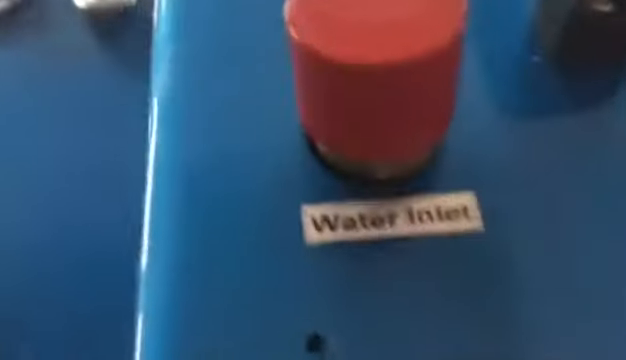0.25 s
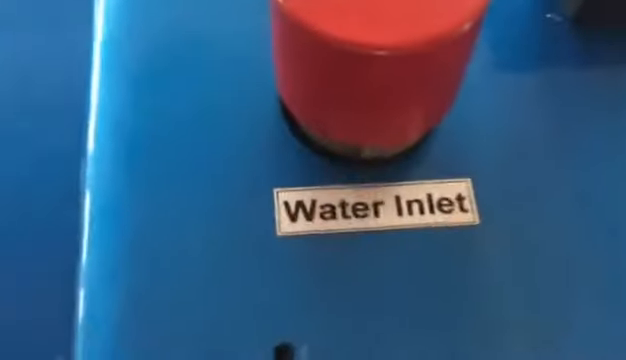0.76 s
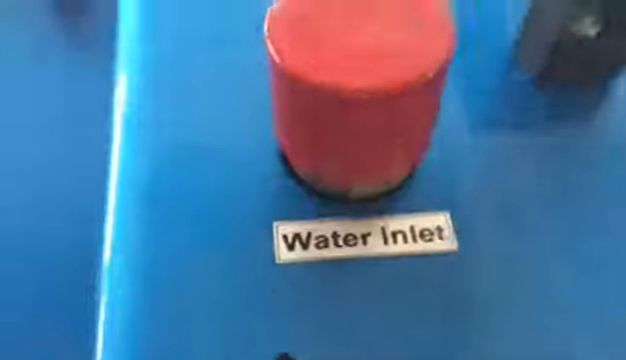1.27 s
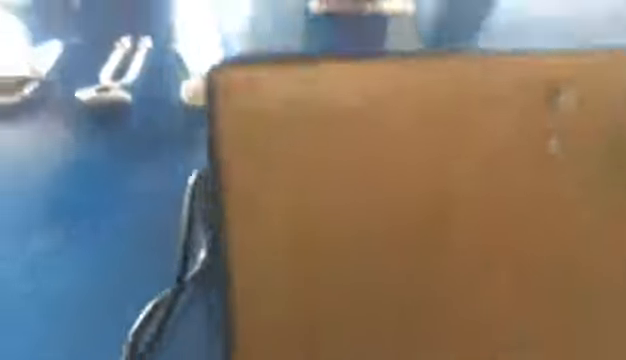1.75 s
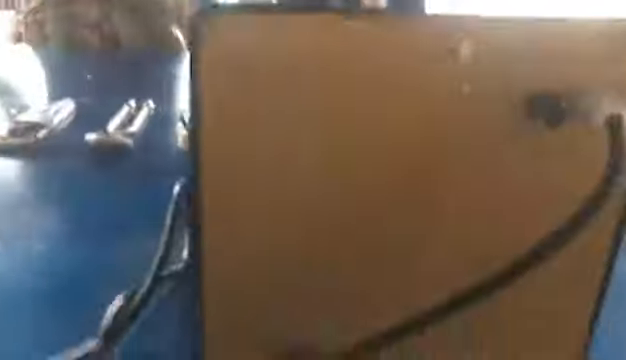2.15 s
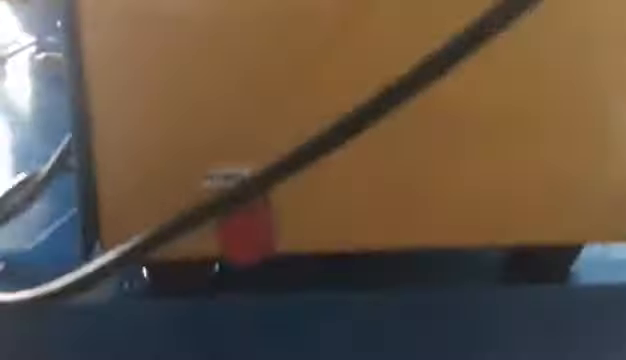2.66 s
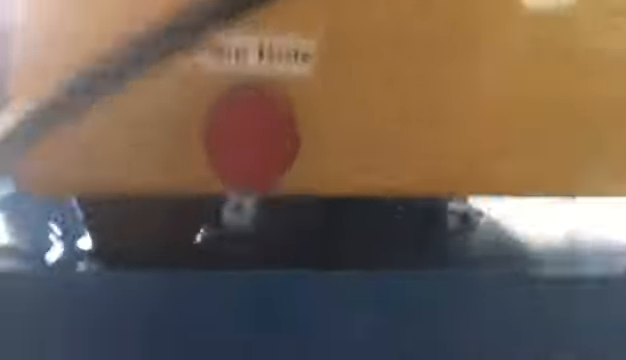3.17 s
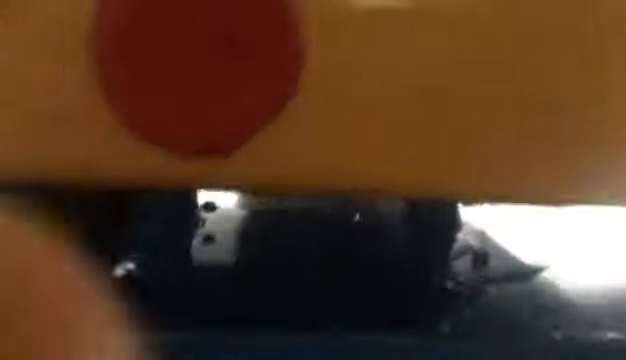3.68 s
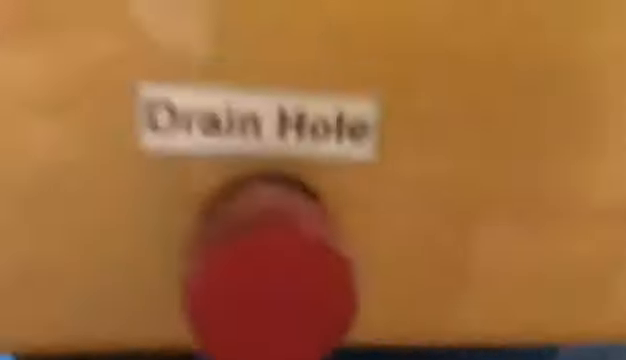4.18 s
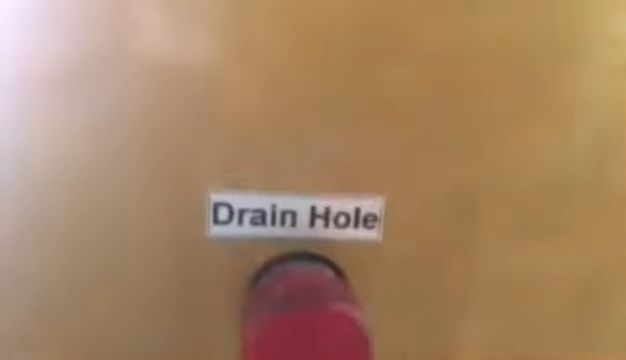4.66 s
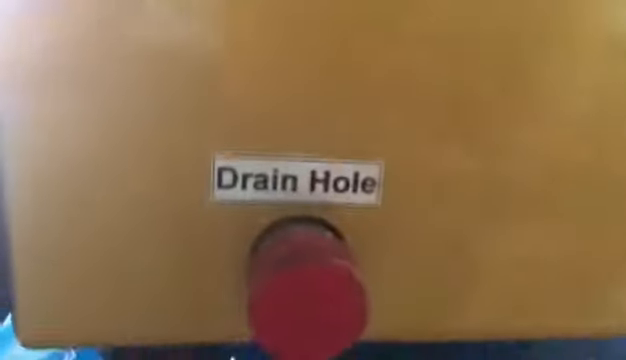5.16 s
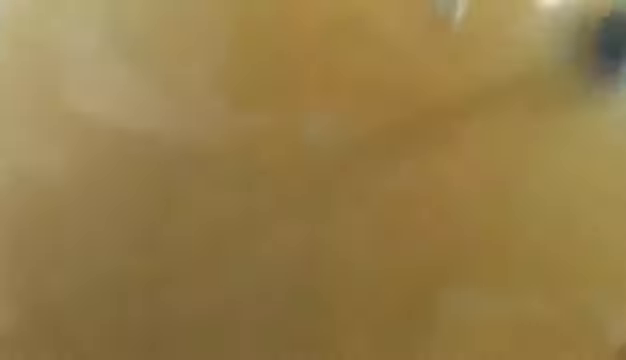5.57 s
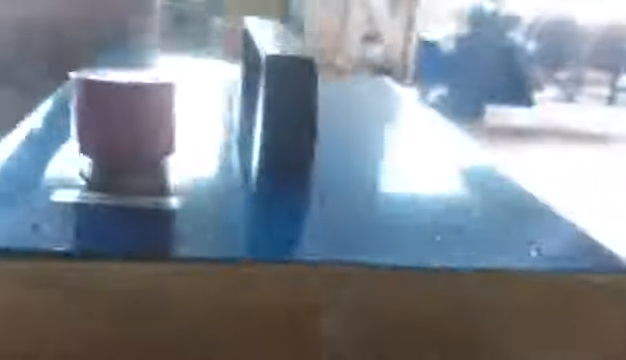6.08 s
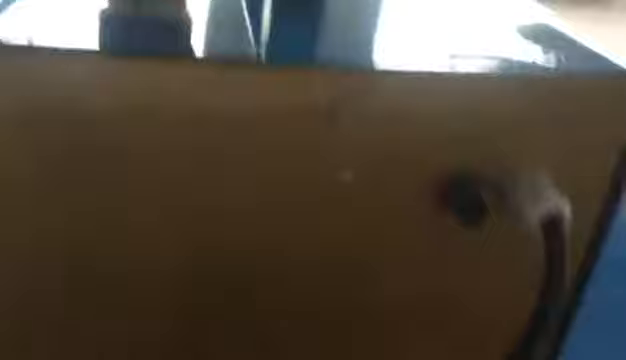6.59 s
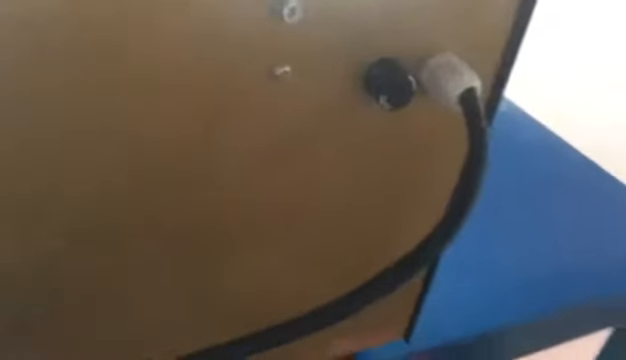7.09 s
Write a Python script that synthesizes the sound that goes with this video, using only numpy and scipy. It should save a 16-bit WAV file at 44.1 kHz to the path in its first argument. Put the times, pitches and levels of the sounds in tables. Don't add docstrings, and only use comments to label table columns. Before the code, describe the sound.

A bench cooling unit drones and whirs continuously, its tone shifting as the microphone moves, with brief rattling clinks, dry scuffs and one thump.

```python
import sys
import numpy as np
from scipy import signal
from scipy.fft import rfft, irfft, next_fast_len
from scipy.io import wavfile
from scipy.ndimage import uniform_filter1d, map_coordinates

SR = 44100
rng = np.random.default_rng(int(sys.argv[2]) if len(sys.argv) > 2 else 0)


def volts(x):
    e = np.asarray(x, float) / 20
    return 10 ** e


def digitize_waveform(pressure):
    field = np.atleast_2d(pressure).T
    bounded = np.clip(field, -1, 1)
    quanta = np.round(bounded * 32767).astype(np.int16)
    wavfile.write(sys.argv[1], SR, quanta)


N = 323253
TICKS = np.arange(0, N + 32, 32)
KNOCK_HZ, SHAFT_HZ, MAINS_HZ = 213.1, 43.3, 99.9

# from_s, to_s
PLACES = [(0, 1.48), (1.78, 2.2), (2.66, 2.9), (3.55, 4.05), (4.4, 5.4), (5.7, 7.33)]
# time_s, hum_db, rush_db
WANDER = [(0, -28, -41.5), (.35, -25.5, -40), (1.24, -26, -40.5), (1.67, -27, -41.5), (2.18, -29, -42.5),
          (2.7, -28.5, -44.5), (3.0, -28, -42.5), (3.37, -28, -40), (3.75, -27.5, -39), (4.3, -26.5, -38.5),
          (4.82, -26.7, -40), (5.35, -27.2, -40), (5.65, -26.8, -41.5), (6.15, -28.5, -43),
          (6.45, -28, -41), (6.8, -26.5, -42.5), (7.25, -27.5, -41.5), (7.33, -30, -40)]
# overtone2_db, overtone3_db, overtone4_db, overtone5_db, overtone6_db
OVERTONES = [(-57.5, -48.5, -43, -40.5, -46), (-55.5, -49, -48, -54, -43), (-52, -46.5, -43, -37, -45.5),
             (-50.5, -43.5, -37.5, -37.5, -40), (-52.5, -45, -43.5, -37.5, -46),
             (-54.5, -53, -54, -49.5, -45.5)]
# time_s, overtone_number, half_length_s, level_db
NODES = [(0, 3, .2, -23), (1.61, 3, 0.15, -17), (2.44, 5, 0.18, -15), (2.722, 4, 0.46, -8),
         (2.95, 6, 0.15, -36), (5.518, 6, .08, -9), (5.653, 4, 0.16, -8), (6.85, 4, .2, -8),
         (7.2, 5, 0.25, -17)]
# knock_multiple, mains_multiple, shaft_multiple, level_db
SIDE_LINES = [(1, 0, -1, -56), (1, 0, 1, -51), (3, 0, 1, -54), (3, 1, 0, -58), (4, 0, -1, -56),
              (4, 0, 1, -55), (5, -1, -1, -58), (4, 1, 0, -54), (5, -1, 0, -53), (5, 0, -1, -55),
              (5, 0, 1, -54), (6, -1, -1, -57), (5, 1, 0, -60), (6, -1, 0, -62), (6, 0, 1, -62),
              (6, 1, 0, -59), (7, -1, 1, -60), (7, 0, -1, -55), (7, 0, 0, -54), (7, 0, 1, -57),
              (8, -1, -1, -57), (7, 1, 0, -59), (8, 0, -1, -61), (8, 0, 0, -55), (8, 0, 1, -63),
              (8, 1, 0, -61), (9, 1, 0, -65), (10, 1, 0, -60), (11, 1, 0, -63), (12, 0, 0, -58)]
BEATS = [(0, 0, .6), (1, 0, 1.6), (0, 1, 1.1), (1, -1, 1.2), (1, 1, .9)]
# pitch_hz, depth_db
RIDGES = [(1200, 1.2), (2200, 2.6), (6000, 3)]
# pitch_hz, level_db (per Hz)
CABINET = [(190, 0.5), (240, 0.5), (380, -8), (1000, -6), (3000, -14.5), (4500, -21), (7000, -25.5),
           (14200, -40)]
# pitch_hz, width_hz, level_db
GRILLE = [(2900, 120, -5.5), (4994, 270, -4.5), (6420, 300, 4), (9360, 240, 4.5), (10330, 250, -8),
          (11970, 310, 7.5)]
# pitch_hz, width_octaves
PANELS = [(800, 0.45), (1600, .3), (3100, 0.37), (6500, 0.63), (14000, 0.74)]
# panel1_db, panel2_db, panel3_db, panel4_db, panel5_db
FACING = [(3, 1.5, 0.5, -.5, -3.5), (-3, -2, -0.5, 0, -1), (-1, -5.5, -1.5, 1, 1), (-1.5, 2, 4, 1.5, 2),
          (2, 4.5, -2.5, 1.5, 3.5), (-2.5, -4.5, 0, -1.5, 2)]
# pitch_hz, width_hz, level_db
STANDING = [
    [(730, 69, -8.5), (2030, 200, -5), (2283, 160, 5.5)],
    [(1074, 150, 6.5), (1200, 170, -7.5), (1530, 78, 6), (1840, 230, -2.5), (2220, 73, 4)],
    [(1980, 77, -3), (2210, 250, 3.5), (2860, 100, 2)],
    [(610, 130, 5), (1030, 200, 5.5), (1850, 49, 6), (2630, 58, 4)],
    [(1900, 220, -5.5), (2290, 120, 7), (2900, 85, 4.5), (3680, 560, 3)],
    [(1095, 360, 2), (1230, 87, -5.5), (1540, 75, 8.5), (2165, 52, 3.5), (2720, 31, 2)],
]
# pitch_hz, width_hz, level_db
GLANCING = [
    [(7400, 150, -9), (8330, 270, -1.5), (11850, 180, -3)],
    [(5000, 180, 1), (7500, 170, -7), (11300, 500, 3), (14100, 160, 6)],
    [(5130, 150, -2), (7340, 350, -3), (10910, 270, 5.5), (13800, 350, -4)],
    [(4300, 350, -2), (5070, 220, 3), (7300, 610, -3), (7700, 130, 4), (13000, 180, 4), (13700, 230, -10)],
    [(4430, 250, -4.5), (5230, 170, -5.5), (7130, 220, -4), (7980, 170, 3.5), (9000, 120, -2),
     (10340, 130, 10.5), (10500, 130, -5), (12200, 200, -6), (13800, 350, -7)],
    [(5040, 180, 4.5), (11900, 250, -3.5)],
]
# pitch_hz, level_db (per Hz)
RUMBLE = [(22, -36), (31, -21.5), (45, -5), (60, 1), (90, -2), (140, -5), (190, -7), (215, -66.5)]
RUMBLE_DB = [-42.5, -44, -42.5, -42.5, -42.5, -41]
# start_s, peak_db, best_rung_hz, spread_octaves
CLINKS = [(2.042, -38, 4000, 1.2), (2.0485, -24.5, 3800, 1.2), (2.053, -30, 8000, 1.5),
          (2.057, -26, 4200, 0.87), (2.065, -30, 3700, 1), (2.077, -30, 3900, 1.1),
          (2.081, -34, 6500, 0.66), (2.088, -36, 4000, 0.84), (2.099, -34.5, 6000, 1.1),
          (2.36, -38, 12500, 0.41), (2.598, -20.5, 3550, 0.092), (2.602, -35, 7000, 0.64),
          (5.799, -42, 3250, .15)]
# pitch_hz, level_db, fade_60db_s
METAL = [(3250, -2.5, 0.048), (3550, -8, 0.047), (4030, 1.5, 0.031), (4620, -5, 0.035), (6000, -9, 0.033),
         (6850, -2.5, 0.039), (10700, -12, 0.028), (12500, -8, 0.017)]
# start_s, level_db, rise_s, fade_60db_s
SCUFFS = [
    (0.514, -48.5, .01, .28),
    (1.86, -56, .15, .35),
    (2.049, -53, .003, .3),
    (2.345, -53.5, .008, .12),
    (2.597, -56, .002, .08),
    (7.2, -56, .08, .3),
]
# pitch_hz, level_db (per Hz)
SCUFF_COLOUR = [(2000, -30), (4000, -8), (8000, -5), (10500, 1), (12000, 6), (14000, 3)]
# start_s, peak_db, swing_pitch_hz
BUMPS = [
    (3.612, -26, 150),
    (3.8302, -13.5, 95),
]
# time_s, pitch_hz, level_db
FAR_MOAN = [(6.1, 430, -75), (6.16, 470, -48), (6.33, 515, -46), (6.47, 445, -47), (6.55, 410, -75)]
# pitch_hz, step_db
COARSE = [(1500, -30), (2600, -3), (4000, 2), (6000, 4), (9000, 6), (12000, 7), (14000, 10)]


def motor():
    t = np.arange(N) / SR
    turn = 2 * np.pi * np.cumsum(smooth(KNOCK_HZ + 0.15 * wobble(4))) / SR
    shaft = turn * SHAFT_HZ / KNOCK_HZ
    mains = 2 * np.pi * MAINS_HZ * t
    hum = swell(curves(WANDER)[0] + 0.48 * wobble(14)) * np.cos(turn)
    smear = 0.63
    whine = 0
    for k, levels in enumerate(np.transpose(OVERTONES), start=2):
        silent_db = 0
        for s, order, half_s, db in NODES:
            if round(order) == k:
                silent_db = silent_db + db * np.exp(-((TICKS / SR - s) / half_s) ** 2)
        level = swell(by_place(levels) + silent_db + 0.9 * wobble(5))
        whine = whine + level * np.cos(k * turn + smear * k * k)
    side = 0
    for knock, main, rev, db in np.round(SIDE_LINES):
        hz = knock * KNOCK_HZ + main * MAINS_HZ + rev * SHAFT_HZ
        colour = np.array([place_db(k, hz) for k in range(len(PLACES))])
        level = swell(db - 1 + by_place(colour - colour.mean()) + 2.5 * wobble(4))
        side = side + level * np.cos(knock * turn + main * mains + rev * shaft + 7 * rng.random())
    return np.sqrt(2) * (hum + whine + side), turn, shaft


def rush(turn, shaft):
    knocks = np.cos(turn) + 0.29 * np.cos(2 * turn) + 0.21 * np.cos(3 * turn)
    pulse = knocks + 0.55 * np.cos(shaft) * (1 + 0.92 * np.cos(turn))
    rattle = coloured((1 + 0.4 * pulse) * rng.standard_normal(N), lambda f: -40 * (f < 4800))
    air = coloured((1 + 0.055 * pulse) * rng.standard_normal(N), lambda f: -40 * (f >= 4800))
    buzz_db = -30.5
    source = ridged(air + rattle) + volts(buzz_db) * buzz(turn, shaft)
    band_hz = np.arange(1400, 5000, 10)
    out = np.zeros(N)
    for k in range(len(PLACES)):
        band = np.sqrt(np.sum(volts(place_db(k, band_hz)) ** 2) * 20 / SR)
        nearness = smooth(by_place(np.arange(len(PLACES)) == k))
        out += nearness * coloured(source, lambda f: place_db(k, f)) / band
    return swell(curves(WANDER)[1] - 1.28 + 0.26 * wobble(9)) * out


def buzz(turn, shaft):
    scatter = 0.5
    mains = 2 * np.pi * MAINS_HZ * np.arange(N) / SR
    main, rev, depth = np.transpose(BEATS)
    angle = np.outer(main, mains) + np.outer(rev, shaft)
    swings = np.r_[np.cos(angle), np.sin(angle)]
    out = 0
    for k in range(8, 19):
        lag = 2 * np.pi * scatter * rng.random(len(BEATS)) * (main + rev ** 2 > 0)
        beating = np.r_[depth * np.cos(lag), depth * np.sin(lag)] @ swings
        out = out + swell(3 * wobble(3)) * np.cos(k * turn + 7 * rng.random()) * beating
    return out


def ridged(x):
    hz, _, z = signal.stft(x, SR, nperseg=2048)
    field = uniform_filter1d(rng.standard_normal(z.shape), size=4, axis=0)
    field = uniform_filter1d(field, size=24, axis=1)
    gain = volts(along(RIDGES, hz)[:, None] * unit(field))
    return unit(signal.istft(z * gain, nperseg=2048)[1][:N])


def place_db(k, f):
    level = along(CABINET, f) - 25 * (f < 190)
    for (hz, octaves), db in zip(PANELS, FACING[k]):
        level = level + db * np.exp(-(np.log2((f + 1) / hz) / octaves) ** 2)
    for hz, width, db in GRILLE + STANDING[k] + GLANCING[k]:
        level = level + db * np.exp(-((f - hz) / width) ** 2)
    return level


def rumble():
    def colour(f):
        low_drone = 1.7 * np.exp(-((f - 64) / 5) ** 2)
        high_drone = 6.3 * np.exp(-((f - 118) / 5) ** 2)
        return along(RUMBLE, f) + low_drone + high_drone

    duck_s, duck_length_s, duck_db = 3.99, 0.065, -9
    duck = duck_db * np.exp(-((TICKS / SR - duck_s) / duck_length_s) ** 2)
    return swell(by_place(RUMBLE_DB) + 0.9 * wobble(3.1) + duck) * noise(colour)


def clinks():
    out, t = np.zeros(N + SR), np.arange(SR // 5) / SR
    attack = 1 - np.exp(-t / 0.00054)
    for s, db, centre_hz, octaves in CLINKS:
        for hz, level, t60 in METAL:
            blur = 7 * rng.random() + np.cumsum(rng.standard_normal(len(t))) * 0.15 * hz / 4000
            off_pitch_db = -6 * (np.log2(hz / centre_hz) / octaves) ** 2
            strength = db - 4.5 + level + off_pitch_db + rng.normal(0, 1.4)
            ring = volts(strength - 60 * t / t60) * attack * np.sin(2 * np.pi * hz * t + blur)
            out[round(s * SR):][:len(t)] += ring
    return out[:N]


def scuffs():
    t = np.arange(N) / SR
    stroke = 0
    for s, db, rise, t60 in SCUFFS:
        fade = volts(db - 60 * np.clip(t - s - rise, 0, None) / t60)
        stroke = stroke + fade * np.clip((t - s) / rise, 0, 1)
    return stroke * swell(5.2 * wobble(190)) * noise(lambda f: along(SCUFF_COLOUR, f))


def bumps():
    out, t = np.zeros(N + SR), np.arange(SR // 10) / SR
    knock = np.exp(-((t - 0.0015) / 0.0005) ** 2) - 0.5 * np.exp(-((t - 0.0004) / 0.0004) ** 2)
    for s, db, hz in BUMPS:
        swing = 0.4 * volts(-60 * t / 0.08) * np.sin(2 * np.pi * hz * t)
        out[round(s * SR):][:len(t)] += volts(db) * (0.75 * knock + swing)
    return coloured(out[:N], lambda f: along([(15, -30), (50, 0)], f))


def far_moan():
    hz, db = curves(FAR_MOAN)
    turn = 2 * np.pi * np.cumsum(smooth(hz + 8 * wobble(40))) / SR
    return swell(db + 3.3 * wobble(30)) * np.sin(turn)


def camera_rounding(x, size=1024):
    first = 283
    n, k = np.arange(2 * size), np.arange(size)
    window = np.sin(np.pi * (n + 0.5) / (2 * size))
    waves = np.cos(np.pi / size * np.outer(k + 0.5, n + (size + 1) / 2))
    basis = window * waves * np.sqrt(2 / size)
    halves = np.pad(x, (size - first, 2 * size - (N - first) % size)).reshape(-1, size)
    c = np.hstack([halves[:-1], halves[1:]]) @ basis.T
    frame = np.abs(uniform_filter1d(c ** 2, size=70, axis=1))
    local = np.sqrt(np.minimum(1.1 * frame, np.abs(uniform_filter1d(frame, size=9, axis=0))))
    spare_db = -9 * (rng.random((len(c), 1)) < 0.12)
    choice = uniform_filter1d(rng.standard_normal((len(c), size // 16)), size=4, axis=0)
    choice_db = 2.5 * np.repeat(unit(choice), size // 64, axis=1)
    step = local * volts(along(COARSE, k * SR / 2 / size) + spare_db + choice_db) + 1e-9
    rounded = np.sign(c) * np.floor(np.abs(c) / step + 0.34) * step
    frames = rounded @ basis
    joined = np.r_[frames[0, :size], (frames[1:, :size] + frames[:-1, size:]).ravel()]
    return joined[size - first:][:N]


def unit(x):
    return x / np.sqrt(np.mean(x ** 2) + 1e-20)


def along(points, hz):
    f, v = np.transpose(points)
    return np.interp(np.log(hz + 1), np.log(f + 1), v)


def curves(rows):
    s, *cols = np.transpose(rows)
    return [np.interp(TICKS / SR, s, c) for c in cols]


def by_place(values):
    return np.interp(TICKS / SR, np.ravel(PLACES), np.repeat(values, 2))


def wobble(rate):
    return map_coordinates(rng.standard_normal(int(N * rate / SR) + 4), [TICKS * rate / SR])


def smooth(values):
    return np.interp(np.arange(N), TICKS, values)


def swell(db):
    return smooth(volts(db))


def coloured(x, level_db):
    m = next_fast_len(N + 8192)
    return irfft(rfft(x, m) * volts(level_db(np.fft.rfftfreq(m, 1 / SR))), m)[:N]


def noise(level_db):
    return unit(coloured(rng.standard_normal(N), level_db))


def scene():
    tones, turn, shaft = motor()
    machine = tones + rush(turn, shaft) + rumble()
    return (machine + far_moan() + clinks() + scuffs() + bumps())[None]


def low_pass(x):
    return signal.sosfilt(signal.butter(12, 14210, fs=SR, output="sos"), x)


def record(dry):
    top_hz = 14150
    mix = coloured(camera_rounding(dry[0]), lambda f: -np.clip(f - top_hz, 0, 80))[None]
    return low_pass(mix)


dry = scene()
out = record(dry)
digitize_waveform(out)
```